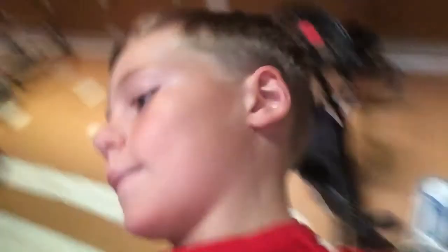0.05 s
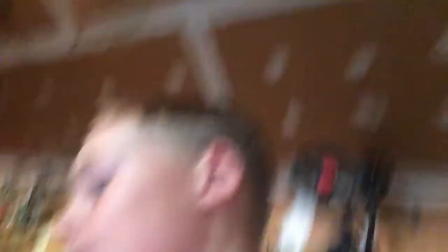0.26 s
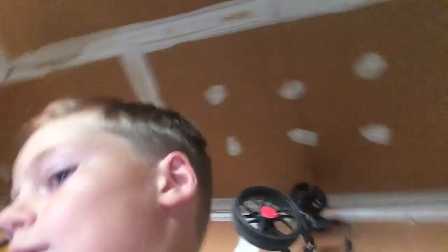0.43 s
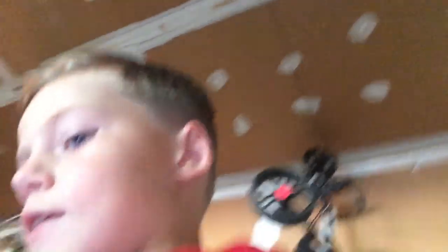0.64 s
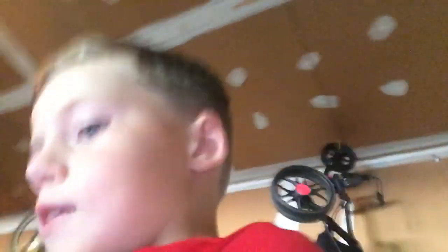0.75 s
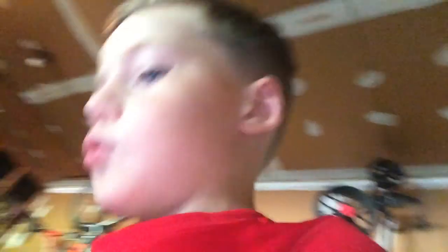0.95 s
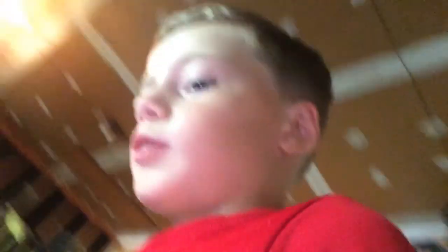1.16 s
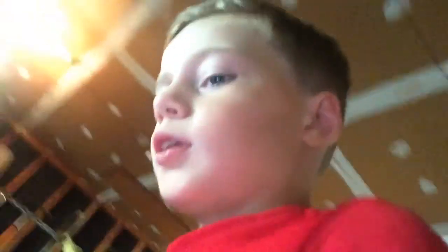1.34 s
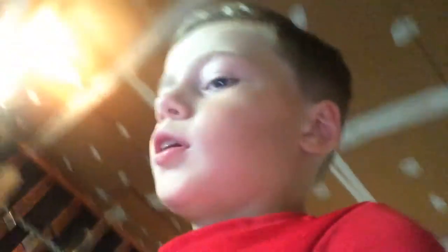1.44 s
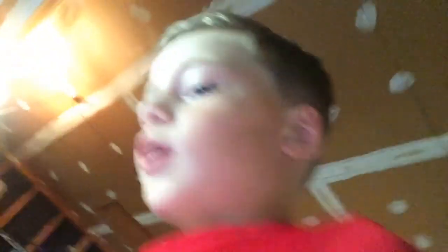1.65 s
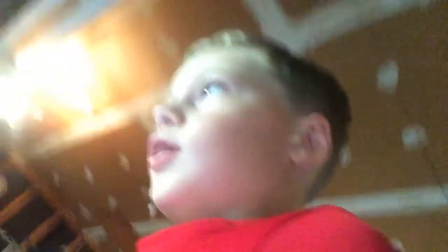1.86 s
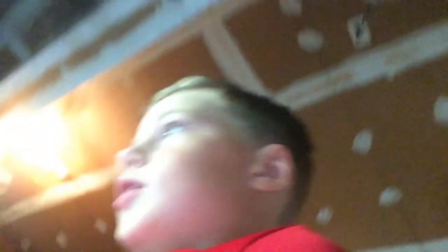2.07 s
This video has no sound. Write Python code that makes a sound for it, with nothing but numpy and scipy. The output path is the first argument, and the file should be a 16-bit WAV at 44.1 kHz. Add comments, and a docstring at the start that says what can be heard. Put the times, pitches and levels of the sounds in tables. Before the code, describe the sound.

Three loud ball bounces slap, thump and ping close to a hand-held microphone in a quiet, echoing garage. A hollow pat on the ball follows the first bounce, with small clicks, handling bumps and faint cloth rustle in between.

```python
"""Quiet garage air, a faint scrape and two ticks; then an air-filled ball is bounced three times on the
hard floor, close to the microphone of a hand-held camera. Each bounce is a slap of the ball's skin and a
low thump as it squashes; the ball pings and the bare room rings for half a second. Between bounces come
a hollow pat on the ball, small clicks, bumps of the hand on the camera and rustling clothes."""
import sys
import numpy as np
from scipy import signal
from scipy.io import wavfile
from scipy.ndimage import uniform_filter1d

SR = 44100
rng = np.random.default_rng(int(sys.argv[2]) if len(sys.argv) > 2 else 0)


def transcribe(u):
    """Save the signal u as a 16-bit wav file named by the first command-line argument.

    u: samples, shape (n,) or (channels, n), limited to [-1, 1]; the rate is SR.
    q: integer samples, one column per channel.
    """
    v = np.clip(np.atleast_2d(u).T, -1, 1)
    q = np.round(v * 32767).astype(np.int16)
    wavfile.write(sys.argv[1], SR, q)


N = 92610
T = np.arange(SR) / SR  # one second, the span of a struck sound
HZ = np.fft.rfftfreq(4096, 1 / SR)

# room tone of the garage: (frequency [Hz], level [dB/Hz])
AIR_SPECTRUM = [(25, -73), (60, -95), (130, -86), (300, -95), (700, -100), (1200, -96), (3500, -104),
                (7000, -108), (10000, -106), (15500, -108)]
# light scrapes of skin or cloth: (time [s], half length [s], level [dB/Hz], centre [Hz], width [octaves])
SKIN_SCRAPES = [(.07, 0.017, -103, 10400, 0.71), (1.415, 0.008, -101, 9900, 0.63),
                (1.58, 0.014, -100, 12000, .5), (1.866, 0.016, -83, 13000, 0.65),
                (1.95, 0.14, -100, 12000, 0.78)]
# close clicks: (time [s], level [dB/Hz], centre [Hz], width [octaves], decay [s], low knock [dB/Hz])
CLOSE_CLICKS = [(0.121, -96, 600, 1, 0.0059, -75.5), (0.13, -101, 2500, 0.94, 0.0033, -80),
                (.4865, -71, 300, 0.36, 0.009, -74), (0.5698, -80, 1500, 1.1, .0015, -62),
                (0.5939, -64.5, 8900, 3.7, 0.00088, -60), (0.7427, -67, 2530, 0.53, 0.0016, -71.5),
                (0.814, -80, 500, 0.54, 0.0015, -78.5), (.9572, -73.5, 7000, 2.8, 0.0013, -76),
                (.971, -78.5, 1010, 0.57, .006, -100), (1.651, -75.5, 5130, 0.52, 0.0046, -73)]
# the ball on the floor: (time [s], slap [dB], thump [dB], thump pitch [Hz], echo [dB], echo delay [s],
# ping [dB], boom [dB], hollow note [dB], hollow pitch [Hz], hum [dB])
FLOOR_HITS = [(0.1994, 5, -9.5, 128, -13, 0.013, -2.5, -1.5, -32, 399, -25),
              (1.046, 4, -6.5, 121, 6.5, 0.0064, -1, -8.5, -23.5, 385, -5.5),
              (1.7257, 5, -7, 148, 0.5, 0.0056, -2.5, -2, -27, 414.7, -4.5)]
# tint of each bounce's smack and room tail:
# (sub [dB], bass [dB], low mid [dB], mid [dB], presence [dB], treble [dB], air [dB])
HIT_TINTS = [(-14.5, 0.5, -3, -1, -3.5, -0.5, 1), (9.5, 0.5, 2, -1, -3.5, -1, 0.5),
             (-0.5, -0.5, -1.5, -0.5, -1, 1.5, 2.5)]
# centres of those seven registers: (frequency [Hz])
TINT_HZ = (55, 150, 450, 1100, 3000, 6000, 12000)
# the sharp slap of contact and the longer smack with it: (frequency [Hz], level [dB/Hz])
SLAP_SPECTRUM = [(100, -76), (500, -46), (1200, -47), (2500, -49.5), (5000, -47.5), (7500, -58.5),
                 (10000, -53), (16000, -66)]
SMACK_SPECTRUM = [(100, -62), (250, -57), (420, -40), (650, -50.5), (1100, -40), (1700, -53.5), (2400, -51),
                  (3400, -58.5), (7000, -64.5), (11000, -77), (16000, -58)]
# modes of the ball, the room and things in the garage: (frequency [Hz], level [dB], t60 [s])
BALL_MODES = [(766, -34.5, 0.65), (918.7, -31, 0.59), (983, -38, 0.37), (1062, -32.5, 0.16),
              (1262, -31, 0.59), (1320, -27, .35), (1488, -41.5, 0.82), (1735, -35.5, 0.61),
              (2500, -36, 0.64), (3020, -30, 0.27), (3550, -43.5, 0.85)]
ROOM_MODES = [(60.1, -41, 1), (88, -21.5, 0.38), (117.45, -15, 0.41), (155, -23, 0.26),
              (231.7, -24.5, 0.55)]
OBJECT_MODES = [(351, -48.5, 2.1), (297, -50, 1.9), (216, -39, 0.98), (390, -43, 0.84)]
# the bare room's answer to a bounce: (frequency [Hz], level [dB/Hz])
BOUNCE_REVERB = [(30, -92), (60, -47), (90, -48.5), (150, -43.5), (240, -42.5), (320, -53.5), (400, -48),
                 (480, -55), (560, -52), (660, -58), (770, -54.5), (1250, -50), (1600, -56), (2100, -59.5),
                 (3100, -57.5), (4200, -61), (5600, -65), (7300, -75), (9200, -66), (15500, -71)]
# reverberation time of the garage: (frequency [Hz], t60 [s])
GARAGE_T60 = [(60, 0.33), (160, .42), (420, 0.42), (1200, 0.58), (3000, 0.55), (5000, 0.49), (8000, 0.5),
              (15000, 0.27)]
# quivers of the squashed shell: (time [s], level [dB], frequency [Hz], time to peak [s])
SHELL_QUIVERS = [(0.2013, -14, 1480, 0.001), (0.2016, -15, 333, 0.0022), (1.0478, -22.5, 723, 0.0031),
                 (1.0525, -10.5, 3350, 0.00064), (1.7256, -10.5, 4900, 0.00037),
                 (1.7268, -8.5, 940, 0.0015), (1.7276, -18, 1750, 0.002)]
# the hand on the ball: (time [s], level [dB])
HAND_PATS = [(.5100, 4.5), (0.5702, -13)]
# modes of the patted ball: (frequency [Hz], level [dB], t60 [s])
PAT_MODES = [(155, -24.5, 0.035), (429, -29, 0.06), (485.5, -30.5, 0.094), (636, -37.5, 0.092),
             (980, -29, 0.066), (1030, -43.5, .3), (1280, -35.5, 0.062)]
# the room's answer to a pat: (frequency [Hz], level [dB/Hz])
PAT_REVERB = [(100, -75.5), (230, -71.5), (330, -75), (480, -67.5), (780, -85), (1020, -76), (1600, -94),
              (5000, -100), (9000, -102), (15500, -100)]
# the hand on the camera: (time [s], half length [s], level [dB/Hz], centre [Hz], width [octaves])
CAMERA_BUMPS = [(0.735, 0.037, -75.5, 81.4, 0.65), (.85, 0.068, -76.5, 55, 0.54),
                (0.916, 0.0073, -64.5, 65.6, 0.43), (0.97, 0.018, -73, 70, 0.77),
                (1.217, 0.013, -56, 70, .4), (1.26, 0.019, -55, 51.7, 0.58), (1.39, 0.047, -77, 50, 0.74),
                (1.659, 0.0048, -66, 318, 0.32), (1.679, 0.0089, -62, 140, 0.38),
                (1.704, 0.016, -53.5, 72, 0.39), (2.016, 0.0086, -56, 70, 0.93),
                (2.041, .012, -61, 168, 0.57), (2.086, 0.042, -66.5, 75, 0.95)]
# movements of clothes: (time [s], half length [s], level [dB])
CLOTH_MOVES = [(0.773, 0.035, -11), (0.894, .02, -16), (1.396, 0.068, -9), (1.59, 0.056, -7.5),
               (1.726, 0.059, 2), (2.073, 0.042, -5.5)]
# cloth rubbing near the microphone: (frequency [Hz], level [dB/Hz])
CLOTH_SPECTRUM = [(200, -94.5), (800, -86.5), (1500, -88), (4200, -88.5), (7000, -99), (15000, -104)]


def amp(db):
    """Decibels to gain."""
    return 10 ** (np.asarray(db) / 20)


def curve(points, hz=HZ):
    """Interpolates (frequency, value) points on a log-frequency axis."""
    point_hz, values = np.transpose(points)
    return np.interp(np.log(hz + 1), np.log(point_hz + 1), values)


def hill(centre_hz, octaves):
    """A bell-shaped spectrum in dB, with a floor 60 dB down."""
    distance = np.log2((HZ + 1) / centre_hz) / octaves
    return 20 * np.log10(np.exp(-0.5 * distance ** 2) + 1e-3)


def swell(time_s, half_s):
    """A bell-shaped envelope that peaks at time_s."""
    return np.exp(-0.5 * ((np.arange(N) / SR - time_s) / half_s) ** 2)


def add(mix, time_s, sound):
    """Mixes a sound in at a time."""
    part = mix[max(round(time_s * SR), 0):][:len(sound)]
    part += sound[:len(part)]


def colour(x, db):
    """Minimum-phase filter that gives white noise a spectrum in dB per Hz."""
    log_gain = np.log(amp(np.r_[db, db[-2:0:-1]]))
    taps = np.fft.ifft(np.exp(signal.hilbert(log_gain).conj())).real
    return signal.fftconvolve(x, taps)[:len(x)] * np.sqrt(SR / 2)


def burst(decay_s):
    """A puff of noise that dies away; its energy depends only on its decay time."""
    fade = np.exp(-T / decay_s)
    puff = rng.standard_normal(SR) * fade
    return puff * np.linalg.norm(fade) / np.linalg.norm(puff)


def patchy(size, patch_db, t60=((0, np.inf), (SR, np.inf))):
    """Noise whose level drifts in patches over time and frequency; given t60, each band dies away."""
    hz, t, bands = signal.stft(rng.standard_normal(size), SR, nperseg=256)
    patches = uniform_filter1d(rng.standard_normal(bands.shape), size=5, axis=0)
    patches = uniform_filter1d(patches, size=7, axis=1)
    fade_db = -60 * t * curve([(f, 1 / s) for f, s in t60], hz)[:, None]
    gain = amp(patch_db * patches / patches.std() + fade_db)
    return signal.istft(bands * gain, SR, nperseg=256)[1][:size]


def ring(modes):
    """Decaying sines, struck together."""
    return sum(amp(db - 60 * T / t60) * np.sin(2 * np.pi * hz * T) for hz, db, t60 in modes)


def throb(hz, peak_s):
    """A few cycles that swell and die."""
    return T / peak_s * np.exp(1 - T / peak_s) * np.sin(2 * np.pi * hz * T)


def garage_air():
    """Quiet room tone, its level drifting in patches."""
    return colour(patchy(N, patch_db=2.8), curve(AIR_SPECTRUM))


def touches(events):
    """Swells of noise right at the microphone: high for light scrapes, low for bumps on the camera."""
    return sum(colour(rng.standard_normal(N), db + hill(hz, octaves)) * swell(time_s, half_s)
               for time_s, half_s, db, hz, octaves in events)


def clicks():
    """Dry ticks close to the microphone, each with a low knock under it."""
    out = np.zeros(N)
    for time_s, db, hz, octaves, decay_s, knock_db in CLOSE_CLICKS:
        tick = colour(burst(decay_s), db + hill(hz, octaves))
        knock = colour(burst(decay_s=0.004), knock_db + hill(centre_hz=248, octaves=1.41))
        add(out, time_s, tick + knock)
    return out


def slap(db):
    """The ball's skin meets the hard floor in a very short crack."""
    return colour(burst(decay_s=0.00045), curve(SLAP_SPECTRUM) + db)


def bounces(thump_lag_s=0.00078, room_delay_s=0.004, boom_rise_s=0.013, hollow_t60_s=0.55):
    """Close by, the ball slaps, squashes and pings; a near surface echoes and the room booms and hums."""
    out = np.zeros(N)
    build_up = 1 - np.exp(-T / boom_rise_s)
    for hit, register_db in zip(FLOOR_HITS, HIT_TINTS):
        (time_s, slap_db, thump_db, thump_hz, echo_db, echo_s,
         ping_db, boom_db, hollow_db, hollow_hz, hum_db) = hit
        tint_db = curve(list(zip(TINT_HZ, register_db)))
        crack = slap(slap_db)
        smack = colour(burst(decay_s=0.0042), curve(SMACK_SPECTRUM) + tint_db)
        ping = amp(ping_db) * ring(BALL_MODES)
        hollow_note = ring([(hollow_hz, hollow_db, hollow_t60_s)])
        thump = amp(thump_db) * throb(thump_hz, peak_s=0.0045)
        boom = amp(boom_db) * ring(ROOM_MODES)
        hum = amp(hum_db) * ring(OBJECT_MODES)
        add(out, time_s, crack + smack + ping + hollow_note + build_up * (boom + hum))
        add(out, time_s + thump_lag_s, thump)
        add(out, time_s + echo_s, slap(echo_db))
        add(out, time_s + room_delay_s, room_tail(curve(BOUNCE_REVERB) + tint_db))
    return out


def quivers():
    """The ball's shell shakes for a few cycles while it is squashed against the floor."""
    out = np.zeros(N)
    for time_s, db, hz, peak_s in SHELL_QUIVERS:
        add(out, time_s, amp(db) * throb(hz, peak_s))
    return out


def room_tail(spectrum_db, rise_s=0.0023):
    """Dense, uneven reflections from the bare garage swell quickly and die away."""
    reflections = patchy(SR, patch_db=2.37, t60=GARAGE_T60)
    return colour(reflections * (1 - np.exp(-T / rise_s)), spectrum_db)


def pats(rise_s=0.0017, brush_db=-95):
    """A hand meets the ball: a soft hollow note, a brush of skin and a faint answer from the room."""
    out = np.zeros(N)
    note = (1 - np.exp(-T / rise_s)) * ring(PAT_MODES)
    for time_s, db in HAND_PATS:
        brush = colour(burst(decay_s=0.074), np.full_like(HZ, brush_db))
        add(out, time_s, amp(db) * (note + brush + room_tail(curve(PAT_REVERB))))
    return out


def clothes():
    """Cloth rubs near the microphone in short swells of uneven hiss."""
    movement = sum(amp(db) * swell(time_s, half_s) for time_s, half_s, db in CLOTH_MOVES)
    return movement * colour(patchy(N, patch_db=2.5), curve(CLOTH_SPECTRUM))


def scene():
    """The ball and the handling noise over the air of the garage, the same in both channels."""
    ball = bounces() + quivers() + pats()
    handling = clicks() + touches(CAMERA_BUMPS) + touches(SKIN_SCRAPES) + clothes()
    mono = ball + handling + garage_air()
    return np.array([mono, mono])


def record(dry):
    """The camera's microphone thins the deep bass, rounds off the loudest peaks and loses the very top."""
    low_cut_hz, drive, top_hz = 39, 0.87, 16000
    thinned = signal.lfilter(*signal.butter(2, low_cut_hz, "high", fs=SR), dry)
    rounded = np.tanh(drive * thinned) / drive
    low_pass = signal.firwin(511, top_hz, window=("kaiser", 9), fs=SR)
    return signal.oaconvolve(rounded, low_pass[None], "same")


dry = scene()
out = record(dry)
transcribe(out)
```